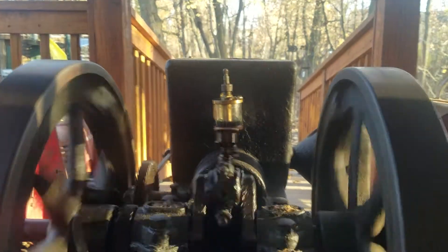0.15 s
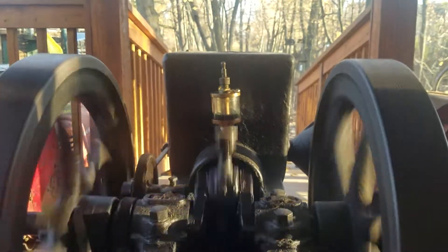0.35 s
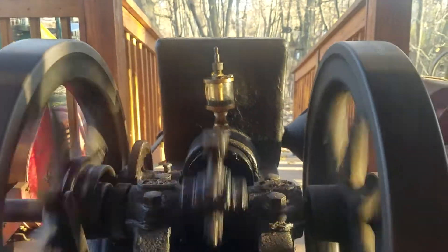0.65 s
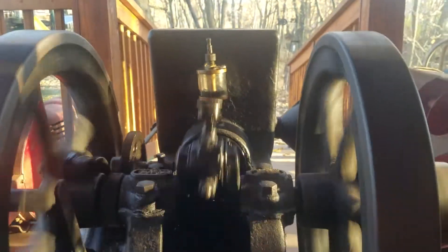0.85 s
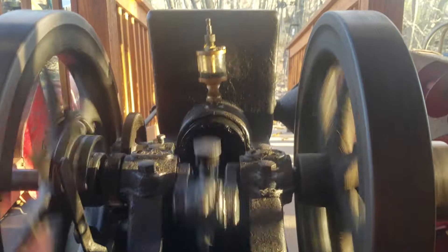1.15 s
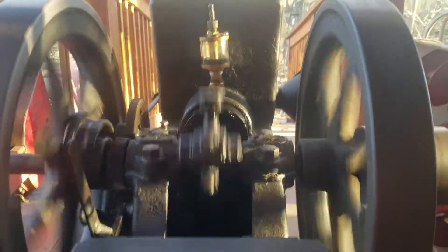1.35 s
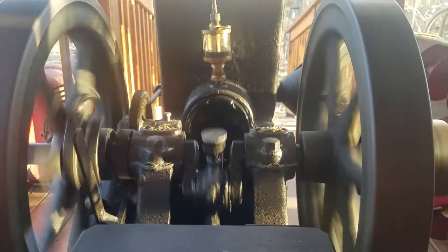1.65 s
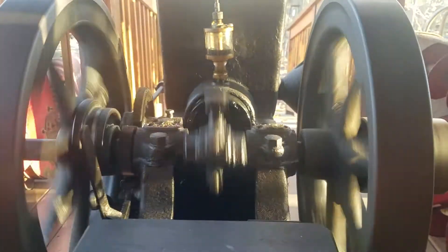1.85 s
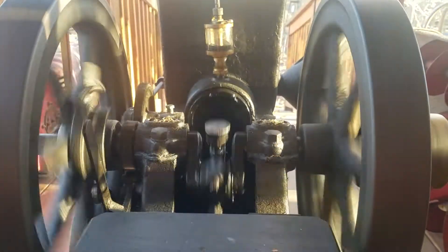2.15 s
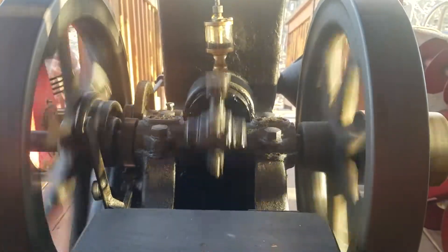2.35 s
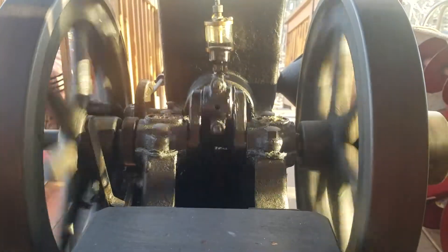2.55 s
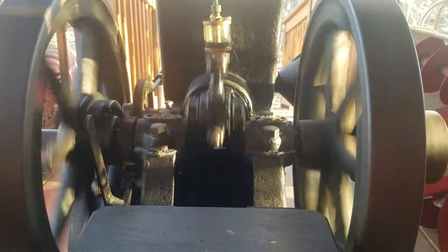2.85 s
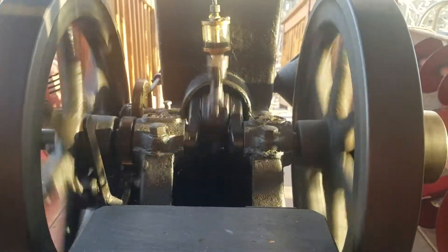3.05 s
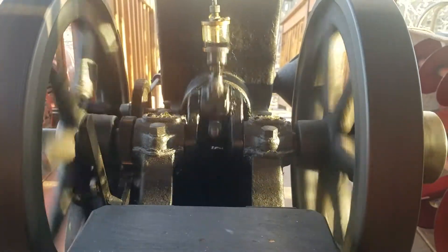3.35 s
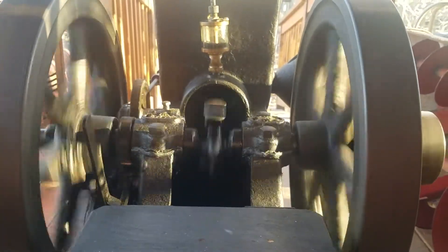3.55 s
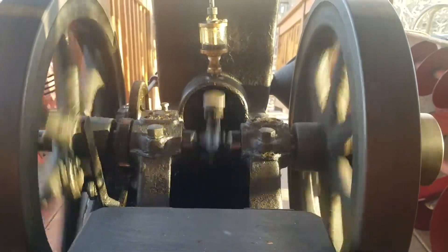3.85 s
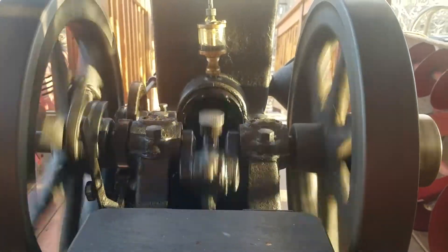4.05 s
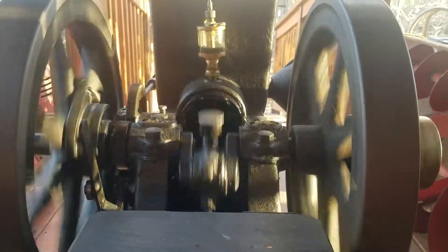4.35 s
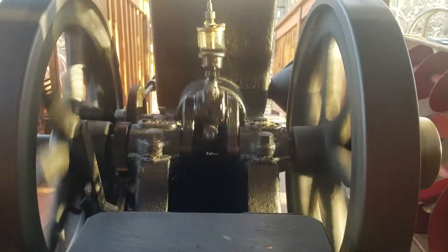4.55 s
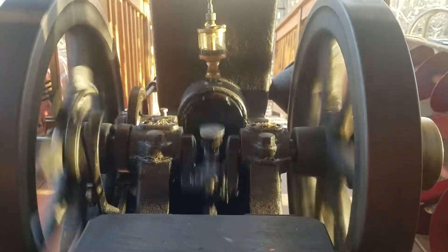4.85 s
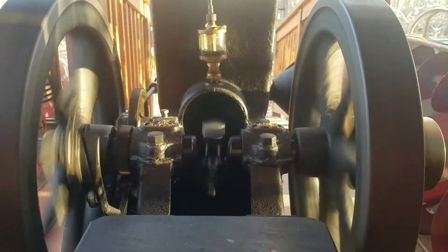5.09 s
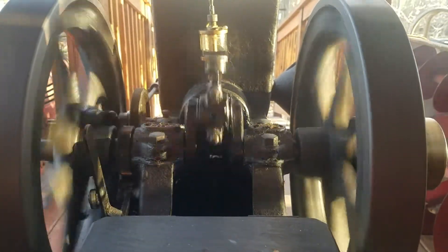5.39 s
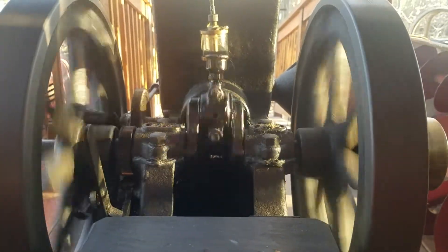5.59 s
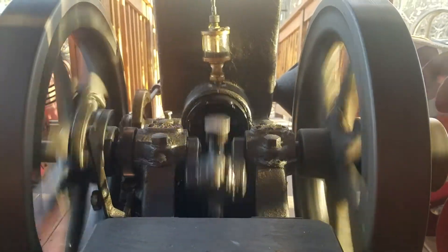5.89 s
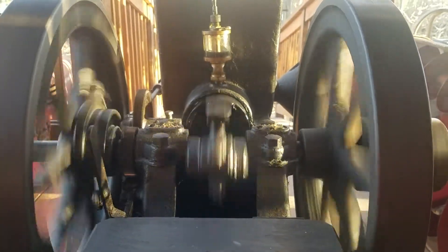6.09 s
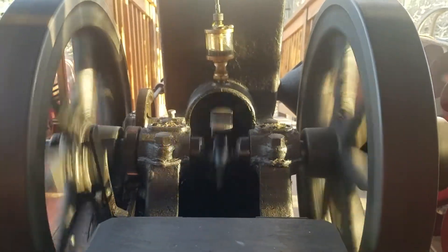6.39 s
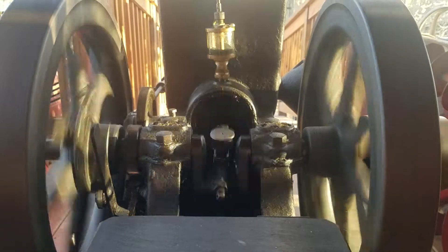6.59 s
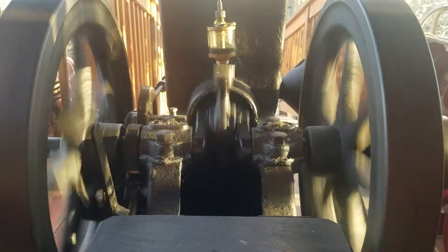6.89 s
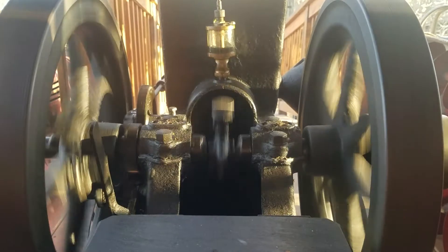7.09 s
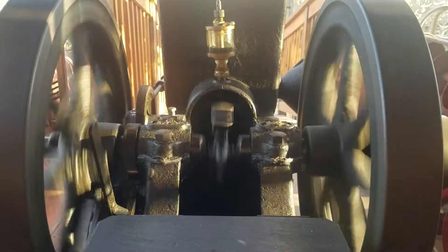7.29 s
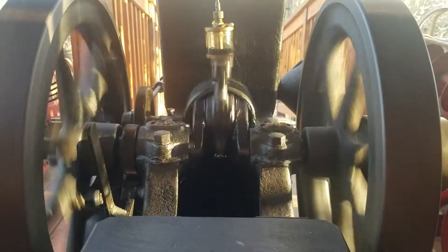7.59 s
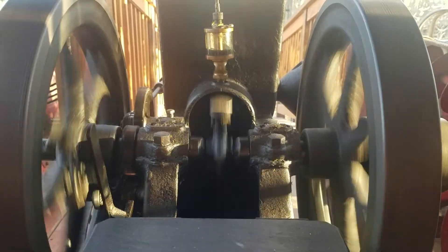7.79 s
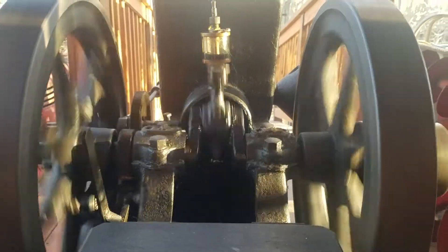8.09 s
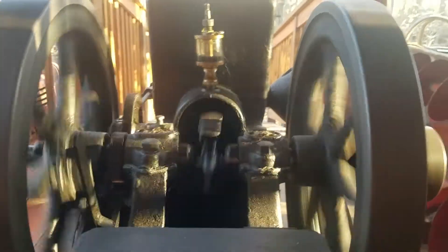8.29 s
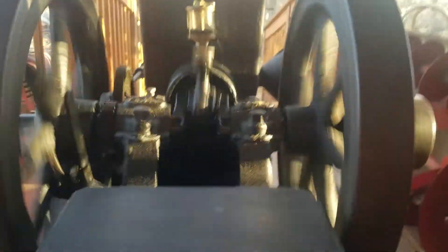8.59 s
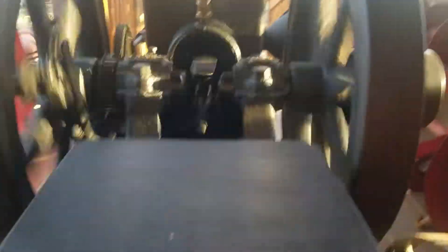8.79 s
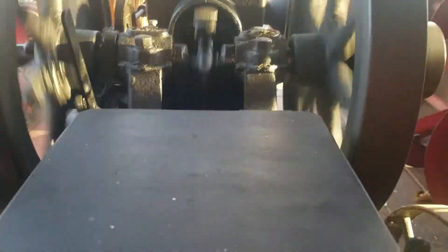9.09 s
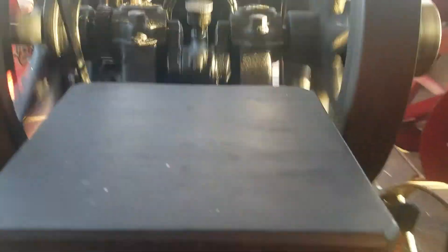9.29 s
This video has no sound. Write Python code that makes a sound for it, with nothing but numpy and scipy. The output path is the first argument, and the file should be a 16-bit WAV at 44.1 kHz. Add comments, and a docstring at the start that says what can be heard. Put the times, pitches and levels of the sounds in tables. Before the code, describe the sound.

A close stereo microphone hears an old single-cylinder engine coasting on a wooden deck. From 0 s, bright iron clacks repeat about four and a half times a second, each with a short metallic ring and a dull board thump. Every second turn adds a denser rattle of cam, push rod and a snapping trip; light ticks and loose gear taps fill the gaps over soft rubbing and low rumble. The rattling grows stronger after 1 s while the pace eases to just over three turns a second by 4 s. Around 4.1 s a heavy falling thud and sputtering hiss burst out amid extra rattles; near 4.4 s comes a tiny rough rising whistle, then another puff at 4.5 s. From 4.6 s the clatter resumes at nearly five a second, lighter at first, fuller by 6 s, slowing again. A faint low jolt falls at 7.5 s; the clatter continues until the end at about 9.4 s.

```python
"""Hit-and-miss engine coasting on a wooden deck

A single-cylinder engine runs close by: each turn of the flywheels thumps the deck and clacks the iron,
and each second turn the cam, push rod and igniter trip rattle. Struck parts are ringing modes and shaped noise.
It slows evenly, fires once with a low jolt, a hiss and a short, rough climbing whistle, and runs on faster.
Rubbing gears and a rumbling deck, both filtered noise, follow the crank underneath."""
import sys
import numpy as np
from scipy import signal
from scipy.fft import rfft, irfft, next_fast_len
from scipy.io import wavfile
from scipy.ndimage import map_coordinates

SR = 44100
rng = np.random.default_rng(int(sys.argv[2]) if len(sys.argv) > 2 else 0)


def store_pcm(level_fs):
    """Save levels as 16-bit WAV."""
    pcm = np.round(np.clip(level_fs, -1, 1) * 32767).astype(np.int16)
    wavfile.write(sys.argv[1], SR, np.atleast_2d(pcm).T)


N = 416304
TIME = np.arange(N) / SR  # s, the whole scene
AGE = TIME[:SR // 2]  # s since a blow

# How alike the two ports hear a sound. Each row: frequency in Hz, left-right correlation.
PORT_LIKENESS = [(30, 1), (100, 0.93), (350, 0.94), (700, 0.76), (1400, 0.25), (3000, 0.0035), (6000, 0)]
# Colour of knocking gear teeth and cam. Each row: frequency in Hz, density in dB per Hz.
GEAR_COLOUR = [(100, -16), (450, -1), (1000, 1.5), (1500, 2), (2300, 3), (3200, -2), (3700, -11),
               (7500, -15), (8800, -30), (15500, -30.5)]
# The casting shudders every turn: crank angle in turns after the clack, dB at full shake, dB per dB of shake.
CASTING_BLOW = (0, -17.5, 0.54)


def amp(db):
    """Decibels to gain."""
    return 10 ** (np.asarray(db) / 20)


def unit(x):
    """x at rms 1."""
    return x / np.sqrt(np.mean(x ** 2) + 1e-20)


def along(points, hz):
    """(Hz, value) points read on a log frequency axis."""
    point_hz, value = np.transpose(points)
    return np.interp(np.log(hz + 1), np.log(point_hz), value)


def wobble(rate):
    """A smooth random curve with rate knots a second."""
    knots = rng.standard_normal(int(N * rate / SR) + 4)
    return map_coordinates(knots, [TIME * rate])


def filtered(x, response):
    """x times a response of frequency, padded so that its tail does not wrap around."""
    n = x.shape[-1]
    padded = next_fast_len(n + 2048, True)
    spectrum = rfft(x, padded) * response(np.fft.rfftfreq(padded, 1 / SR))
    return irfft(spectrum, padded)[..., :n]


def half_angle(hz):
    """Half the phase angle whose cosine is the left-right correlation."""
    return np.arccos(np.clip(along(PORT_LIKENESS, hz), -1, 1)) / 2


def noise(spectrum, size, count=1):
    """count stereo noises, together at rms 1, alike in the bass and unrelated in the treble."""
    def middle_and_side(hz):
        turn = half_angle(hz)
        return amp(along(spectrum, hz)) * [np.cos(turn), np.sin(turn)]
    z = filtered(rng.standard_normal((count, 2, size)), middle_and_side)
    middle, side = z[:, 0], z[:, 1]
    return unit(np.stack([middle + side, middle - side], axis=1))


def fade(t60):
    """A decay that loses 60 dB in t60 seconds."""
    return np.exp(-np.log(1000) * AGE / t60)


def onset(attack):
    """A rise that closes in on 1 with a time constant of attack seconds."""
    return 1 - np.exp(-AGE / attack)


def add(track, s, sound):
    """Mix a sound into a track at s seconds."""
    part = track[:, max(round(s * SR), 0):][:, :len(AGE)]
    part += sound[..., :part.shape[1]]


def ring(hits, modes, attack, scatter_db, detune):
    """Each (s, dB) blow rings the modes anew; the less alike the ports, the more a mode's phase differs."""
    hz, db, t60 = np.transpose(modes)
    skew = half_angle(hz) * rng.choice([-1, 1], len(hz))
    ports = np.exp(1j * np.array([skew, -skew]))
    shapes = np.exp(2j * np.pi * hz[:, None] * AGE) * fade(t60[:, None]) * onset(attack)
    out = np.zeros((2, N))
    for s, level in hits:
        mode_gain = amp(level + db + scatter_db * rng.standard_normal(len(hz)))
        pair = ((ports * mode_gain) @ shapes).imag
        stretch = 1 + detune * rng.standard_normal()
        add(out, s, np.array([np.interp(AGE * stretch, AGE, side) for side in pair]))
    return out


def clatter(hits, spectrum, t60, attack, crack, fresh):
    """Each (s, dB) blow cracks and stirs a thicket of modes, partly the same every time and partly fresh."""
    same, *new = noise(spectrum, size=len(AGE), count=len(hits) + 1)
    share = np.clip(fresh, 0, 1)
    shape = (fade(t60) + crack * fade(0.017)) * onset(attack)
    out = np.zeros((2, N))
    for (s, db), other in zip(hits, new):
        texture = np.sqrt(1 - share) * same + np.sqrt(share) * other
        add(out, s, amp(db) * shape * texture)
    return out


def bounces(hits, gap, drop_db, count):
    """A loose part strikes again, count times, at uneven gaps (s) and on the whole ever weaker."""
    s, db = np.transpose(hits)
    chance = rng.standard_normal((len(s), count, 2))
    later = s[:, None] + np.cumsum(gap * np.exp(0.31 * chance[..., 0]), axis=1)
    weaker = db[:, None] - drop_db * np.arange(1, count + 1) + 2 * chance[..., 1]
    return np.vstack([hits, np.column_stack([later.ravel(), weaker.ravel()])])


def passes(angle, count):
    """Times at which the crank passes an angle, once in count turns, as friction slows it evenly."""
    # The coasts before and after the firing. Each row: first clack in seconds, end in seconds,
    # speed in turns per s, loss of speed in turns per s each second.
    coasts = [(0.0274, 4.14, 4.514, 0.2895), (4.6383, 9.44, 4.971, 0.3145)]
    times = []
    for start, end, speed, friction in coasts:
        last = speed * (end - start) - friction * (end - start) ** 2 / 2
        turns = np.arange(angle, last, count)
        times.append(start + (speed - np.sqrt(speed ** 2 - 2 * friction * turns)) / friction)
    return np.concatenate(times)


def shake(s):
    """How hard the engine shakes in its loose joints at s seconds, in dB."""
    # Each row: time in seconds, shake in dB.
    shake_curve = [(0, -10.5), (0.45, -11), (1.15, 0.5), (2.9, -1.5), (3.6, -4), (4.1, -1), (4.7, -15),
                   (5.05, -14), (5.55, -4), (6.2, -0.5), (7.2, 0), (7.7, -4.5), (8.2, -10.5), (8.75, -1.5),
                   (9.44, -3)]
    return np.interp(s, *np.transpose(shake_curve))


def strikes(part, count):
    """(s, dB) blows of a part that strikes once in count turns, harder the more the engine shakes."""
    angle, db, follows = part
    s = passes(angle, count=count)
    uneven_db = 1.34 * rng.standard_normal(len(s))
    return np.column_stack([s, db + follows * shake(s) + uneven_db])


def crank():
    """The slack in the connecting rod closes once a turn: a bright clack, a rebound and a ringing casting."""
    # Blows: crank angle in turns after the clack, dB at full shake, dB per dB of shake.
    clack_blow = (0, -7.5, 0.33)
    chink_blow = (0, -22, 0.37)
    # Colours of the dense higher modes. Each row: frequency in Hz, density in dB per Hz.
    clack_colour = [(150, -41), (500, -5.5), (1200, -2.5), (2000, 6), (3200, -0.5), (4300, -9), (5600, 1.5),
                    (7700, -2.5), (8700, -15.5), (10000, -6), (12500, -22), (15600, -9.5)]
    casting_colour = [(600, -17), (1700, -9.5), (2600, -1.5), (3400, -5), (4300, -11), (7700, -47),
                      (9000, -25)]
    chink_colour = [(13200, -27.5), (13950, 4.5), (14600, -20), (15350, -3), (15900, -10)]
    # Ringing iron. Each row: frequency in Hz, level in dB, t60 in seconds.
    iron_modes = [(1615, -16.5, 0.33), (1685, -17.5, 0.45), (2008, -15, 0.35), (2482, -8.5, 0.059),
                  (2605, -8.5, 0.064), (2942, -13, 0.17), (3335, -19.5, 0.18), (4950, -19.5, 0.15),
                  (5495, -7.5, 0.043), (6600, -13, 0.082), (7820, -12.5, 0.12)]
    clack = clatter(strikes(clack_blow, count=1), clack_colour, t60=0.086, attack=0.00026, crack=0.92, fresh=0.14)
    blows = strikes(CASTING_BLOW, count=1)
    shudder = bounces(blows, gap=0.0084, drop_db=2.5, count=1)
    casting = clatter(shudder, casting_colour, t60=0.17, attack=0.001, crack=0.26, fresh=0.22)
    iron = ring(blows, iron_modes, attack=0.001, scatter_db=2.5, detune=0.0016)
    chink = clatter(strikes(chink_blow, count=1), chink_colour, t60=0.058, attack=0.0002, crack=0.54, fresh=0.63)
    return amp(-8) * clack + amp(-4.5) * casting + amp(5) * iron + amp(4) * chink


def cam():
    """Every second turn the gear slack closes and the cam rattles in; round the firing the gears rattle more."""
    # Blows: crank angle in turns, dB at full shake, dB per dB of shake.
    slack_blow = (1.515, -15.5, 1.5)
    cam_blow = (1.622, -2.93, 0.94)
    # The governor lets go and the loaded gears rattle. Each row: time in seconds, level in dB.
    firing_rattle = [(3.669, -13), (4.06, -8.5), (4.074, -7.5), (4.09, -10), (4.217, -8.5), (4.314, -10.5),
                     (4.358, -8), (4.414, -12.5), (4.589, -13.5)]
    # Ringing gears. Each row: frequency in Hz, level in dB, t60 in seconds.
    gear_modes = [(513.6, -8, 0.14), (843, -6.5, 0.12), (1150, -16, 0.17), (1408, -2.5, 0.084),
                  (1543, -5.5, 0.092), (1579, 2.5, 0.038), (2086, -2.5, 0.06), (2216, -5.5, .09)]
    contacts = np.vstack([strikes(slack_blow, count=2), strikes(cam_blow, count=2), firing_rattle])
    blows = bounces(contacts, gap=0.007, drop_db=6, count=2)
    rattle = clatter(blows, GEAR_COLOUR, t60=0.13, attack=0.0018, crack=0.64, fresh=0.83)
    ringing = ring(contacts, gear_modes, attack=0.0013, scatter_db=2.5, detune=0.0096)
    return amp(-13.5) * rattle + amp(-8.5) * ringing


def push_rod():
    """The push rod knocks home with one rebound, a short clatter over its ringing modes."""
    # Knocks. Each row: time in seconds, level in dB.
    rod_knocks = [(0.441, -7), (0.9, -4), (1.377, -4), (1.877, -4), (2.402, -4), (3.47, -4.5), (4.05, -8),
                  (5.426, -14), (5.86, -6.5), (6.301, -4.5), (6.757, -5), (7.236, -3.5), (7.727, -3.5),
                  (8.236, -7.5)]
    # Dense higher modes. Each row: frequency in Hz, density in dB per Hz.
    rod_colour = [(100, -29), (330, 1), (550, -12.5), (900, 7), (2200, -4), (2900, -0.5), (3700, -19),
                  (7300, -12), (8800, -24.5), (15500, -24)]
    # Ringing rod. Each row: frequency in Hz, level in dB, t60 in seconds.
    rod_modes = [(700, -6.5, 0.15), (836, -5.5, 0.12), (1005, -9, 0.025), (1526, 2.5, 0.1),
                 (1963, -1, 0.087), (2127, 12.5, 0.043), (2206, 8, 0.094)]
    knocks = bounces(rod_knocks, gap=0.0058, drop_db=3, count=1)
    knocking = clatter(knocks, rod_colour, t60=0.079, attack=0.00038, crack=1, fresh=0.51)
    ringing = ring(rod_knocks, rod_modes, attack=0.00043, scatter_db=1, detune=0.0069)
    return amp(-13) * knocking + amp(-14.5) * ringing


def igniter_trip():
    """The igniter trip snaps every second turn and its spring rings briefly in the treble."""
    # Blow: crank angle in turns, dB at full shake, dB per dB of shake.
    trip_blow = (1.658, -8.5, 0.42)
    # Cocked before the firing, it springs back after it. Each row: time in seconds, level in dB.
    firing_snaps = [(3.669, -14.5), (4.2719, -6)]
    # Dense higher modes. Each row: frequency in Hz, density in dB per Hz.
    trip_colour = [(600, -2), (2000, 5.5), (3100, 3), (3700, -5.5), (5800, -5), (7700, 0), (8700, -17.5),
                   (10300, -5), (12000, -14), (15500, -1)]
    # Ringing spring. Each row: frequency in Hz, level in dB, t60 in seconds.
    spring_modes = [(5840, -8.5, 0.032), (10250, -8.5, 0.027), (14300, -14.5, 0.027), (15560, -11, .035)]
    snaps = bounces(np.vstack([strikes(trip_blow, count=2), firing_snaps]), gap=0.013, drop_db=8.5, count=1)
    snapping = clatter(snaps, trip_colour, t60=0.038, attack=0.0001, crack=0.77, fresh=0.29)
    ringing = ring(snaps, spring_modes, attack=0.00019, scatter_db=5, detune=0.005)
    return amp(-7) * snapping + amp(-5.5) * ringing


def latch():
    """The latch ticks in between, twice in two turns, each tick with a quick rebound."""
    # Blows there and back: crank angle in turns, dB at full shake, dB per dB of shake.
    latch_blow = (0.73, -22.5, 0.48)
    latch_return = (0.89, -33, 0.79)
    # Dense higher modes. Each row: frequency in Hz, density in dB per Hz.
    latch_colour = [(600, 4.5), (2400, -3.5), (3800, -3.5), (5700, 2.5), (7800, -3.5), (9000, -10),
                    (12000, -11.5), (15000, -5)]
    both = np.vstack([strikes(latch_blow, count=2), strikes(latch_return, count=2)])
    ticks = bounces(both, gap=0.0032, drop_db=5.5, count=1)
    return amp(-7.5) * clatter(ticks, latch_colour, t60=0.077, attack=0.00021, crack=1, fresh=0.62)


def backlash():
    """Gear teeth tap loosely, three times at random in the last third or so of each turn."""
    s, db = strikes(CASTING_BLOW, count=1).T
    period = np.gradient(s)
    taps = []
    for _ in range(3):
        early = period * rng.uniform(0.08, 0.36, len(s))
        taps.append(np.column_stack([s - early, db + 2.8 * rng.standard_normal(len(s))]))
    tapping = clatter(np.vstack(taps), GEAR_COLOUR, t60=0.1, attack=0.00059, crack=0.68, fresh=0.46)
    # grease softens the contact
    return filtered(amp(-9.5) * tapping, lambda hz: 1 / (1 + (hz / 3500) ** 2))


def deck():
    """The piston's reversal rocks the boards before each clack; a jolt sinks from the boards to the joists."""
    # Blow: crank angle in turns after the clack, dB at full shake, dB per dB of shake.
    thump_blow = (-0.085, -19, 0.59)
    # Ringing boards. Each row: frequency in Hz, level in dB, t60 in seconds.
    deck_modes = [(111, -18.5, 0.3), (165.4, -2.5, 0.14), (204, -7, 0.32), (243.4, -8, 0.27),
                  (311, -2, 0.14), (371.8, -0.5, 0.16)]
    # Heavy jolts, the first from the firing. Each row: start in seconds, level in dB, first Hz, last Hz,
    # t60 in seconds.
    jolts = [(4.136, -7.5, 263, 107, 0.15), (7.521, -16, 150, 123, 0.15)]
    out = amp(-1.5) * ring(strikes(thump_blow, count=1), deck_modes, attack=0.0029, scatter_db=3, detune=0.018)
    for s, db, first_hz, last_hz, t60 in jolts:
        pitch = last_hz + (first_hz - last_hz) * np.exp(-(AGE / 0.0145) ** 2)
        tone = np.sin(2 * np.pi * np.cumsum(pitch) / SR)
        add(out, s, amp(db) * fade(t60) * onset(0.001) * tone)
    return out


def escaping_gas():
    """The burnt charge sputters past the piston, then out of the exhaust valve: hiss over a low rumble."""
    # Puffs. Each row: crest in seconds, rise in seconds, t60 in seconds, hiss in dB, rumble in dB.
    puffs = [(4.159, 0.031, 0.28, -15.5, -16.5), (4.439, 0.061, 0.37, -20, -22.5),
             (4.541, 0.0081, 0.15, -14, -22.5)]
    # Colours of hiss and rumble. Each row: frequency in Hz, density in dB per Hz.
    hiss_colour = [(240, -33), (400, -1), (814, -6), (1060, -12), (1400, -1.5), (4180, -14), (4950, -15),
                   (16000, -14.5)]
    exhaust_colour = [(25, -25), (70, 3), (150, 3.5), (300, -5), (600, -32)]
    hiss, rumble = noise(hiss_colour, size=N)[0], noise(exhaust_colour, size=N)[0]
    # only the coarser part of the hiss sputters
    coarse = filtered(hiss, lambda hz: 1 / (1 + (hz / 4500) ** 4))
    sputter = unit(amp(4 * wobble(160) + 4 * wobble(45)))
    hiss += coarse * (sputter - 1)
    out = np.zeros((2, N))
    for s, rise, t60, hiss_db, rumble_db in puffs:
        before = (s - TIME) / rise * 2
        after = np.log(1000) * (TIME - s) / t60
        flow = np.exp(-np.maximum(before, after))
        out += flow * (amp(hiss_db) * hiss + amp(rumble_db) * rumble)
    return out


def valve_whistle():
    """The exhaust whistles through its opening valve: a climbing sine with a rough, unsteady pitch."""
    # Each row: time in seconds, pitch in Hz, level in dB.
    whistle_path = [(4.41, 7300, -54), (4.429, 7660, -9.5), (4.45, 8140, -18), (4.466, 9200, -18),
                    (4.485, 9300, -57)]
    s, hz, db = np.transpose(whistle_path)
    pitch = np.interp(TIME, s, hz) * (1 + 0.04 * wobble(2500) + 0.02 * wobble(200))
    level = amp(np.interp(TIME, s, db)) * (TIME > s[0]) * (TIME < s[-1])
    return level * np.sin(2 * np.pi * np.cumsum(pitch) / SR)


def running():
    """Gears and bearings rub in step with the crank, over the rumble of the deck."""
    # Rubbing over one turn. Each row: turns after the clack, load in dB.
    stroke_load = [(0, 2.5), (.2, 0.5), (.45, -2.5), (.62, -1), (.8, 3.5), (1, 6)]
    # Colours of rumble and rubbing. Each row: frequency in Hz, density in dB per Hz.
    rumble_colour = [(13, -42), (22, -31), (38, -71), (65, 0.5), (103, -7.5), (156, -1.5), (204, -0.5),
                     (270, -7), (375, -7), (426, -18), (460, -18), (600, -9.5), (1010, -120)]
    rub_colour = [(210, -27), (350, 0), (467, -10), (696, -3), (779, -7), (974, -3), (1240, -10.5),
                  (1430, -3), (2460, -22.5), (16000, -46)]
    beats = passes(0, count=1)
    turn = np.interp(TIME, beats, np.arange(len(beats))) % 1
    load_db = np.interp(turn, *np.transpose(stroke_load))
    shake_db = shake(TIME)
    rumble = amp(-37 + 0.38 * shake_db + 0.5 * load_db) * noise(rumble_colour, size=N)[0]
    # the teeth mesh unevenly, in clumps
    grain = unit(amp(2.5 * wobble(130) + 2 * wobble(35)))
    rub = amp(-34 + 0.5 * shake_db + 1.09 * load_db) * grain * noise(rub_colour, size=N)[0]
    return rumble + rub


def porch(x):
    """Railings, boards and the engine's own castings prolong x: convolution with a fading noise tail."""
    # Each row: frequency in Hz, t60 in seconds.
    porch_decay = [(150, 1), (1500, 0.26), (4000, 0.15), (14000, 0.17)]
    burst = noise([(100, 0.0057), (16000, 0)], size=len(AGE))[0]
    hz, t, z = signal.stft(burst, SR, nperseg=256)
    decay = np.exp(-np.log(1000) * t / along(porch_decay, hz)[:, None])
    tail = signal.istft(z * decay, SR, nperseg=256)[1]
    tail = tail[:, :len(AGE)] * onset(0.003)
    return signal.fftconvolve(x, tail / np.linalg.norm(tail[0]), axes=1)[:, :N]


def scene():
    """The engine and its surroundings; only the metal parts sound through the porch."""
    metal = crank() + cam() + push_rod() + igniter_trip() + latch() + backlash()
    return metal + amp(-12.5) * porch(metal) + deck() + escaping_gas() + valve_whistle() + running()


def record(dry):
    """The left port is shaded in the treble; the recorder rounds off peaks and ends at its band limit."""
    # Each row: frequency in Hz, left minus right in dB.
    port_shade = [(100, 2), (500, 0), (2200, -2), (3500, -3.5), (4400, -4.5), (7500, -13.5), (8600, -33),
                  (9600, -6.5), (14000, -8), (15400, -3)]

    def ports(hz):
        left = amp(along(port_shade, hz))
        return np.array([left, np.ones_like(left)]) / np.sqrt((1 + left ** 2) / 2)
    x = filtered(dry, ports)
    x = x / (1 + x ** 6) ** (1 / 6)
    return filtered(x, lambda hz: hz < 15950)


dry = scene()
out = record(dry)
store_pcm(out)
```